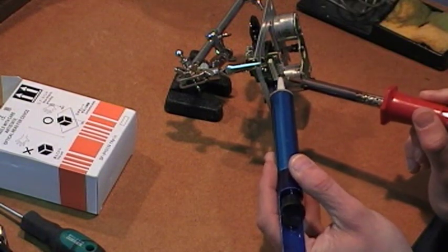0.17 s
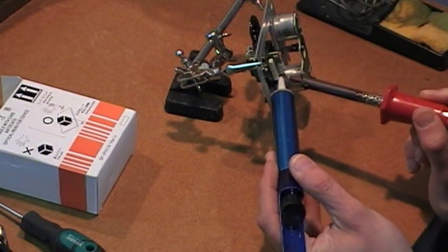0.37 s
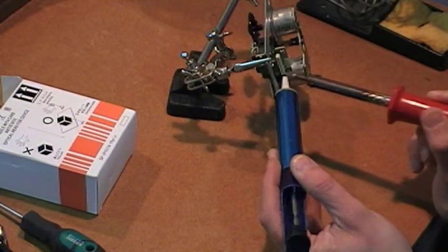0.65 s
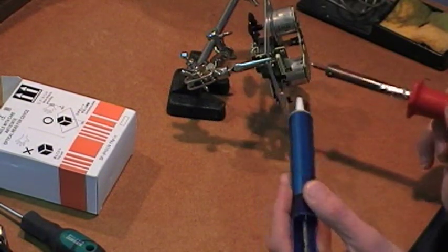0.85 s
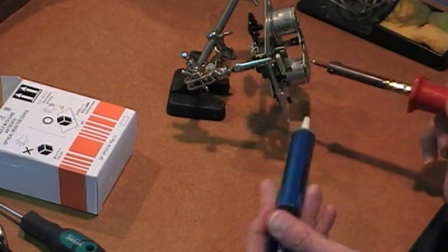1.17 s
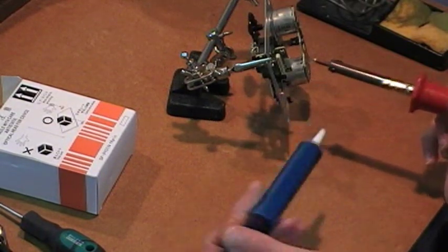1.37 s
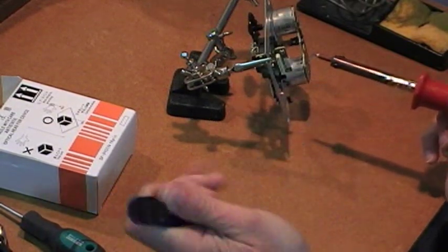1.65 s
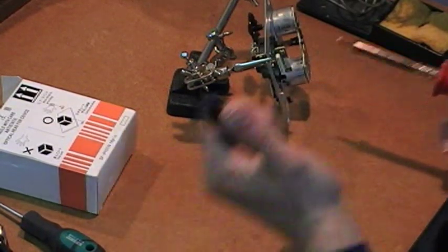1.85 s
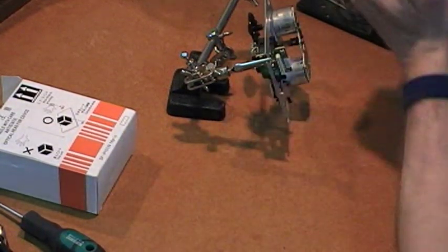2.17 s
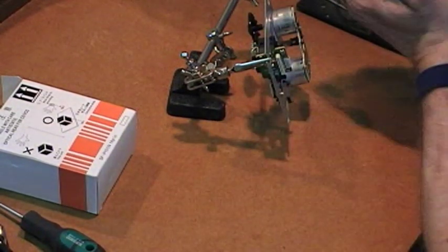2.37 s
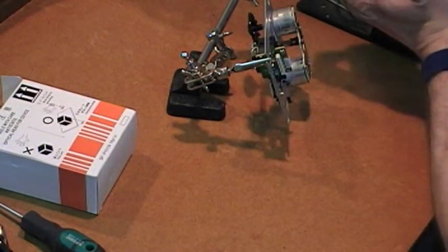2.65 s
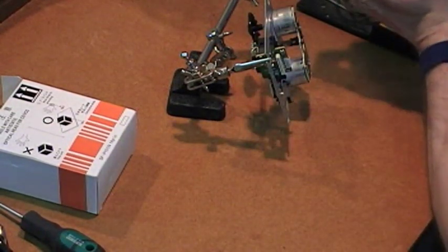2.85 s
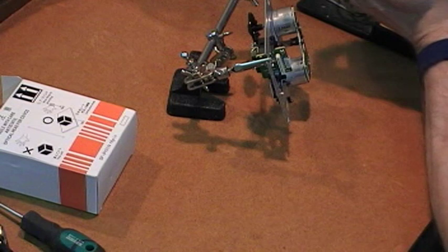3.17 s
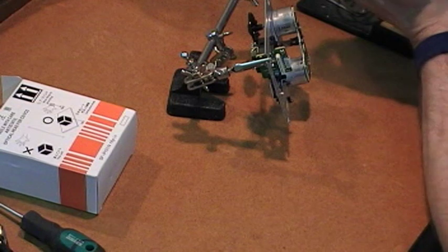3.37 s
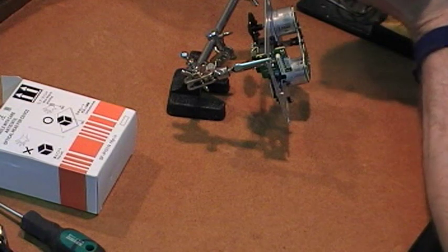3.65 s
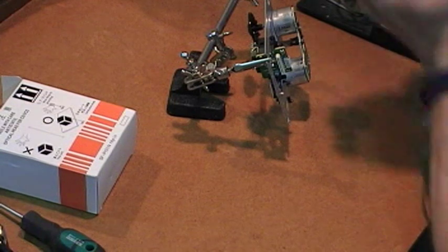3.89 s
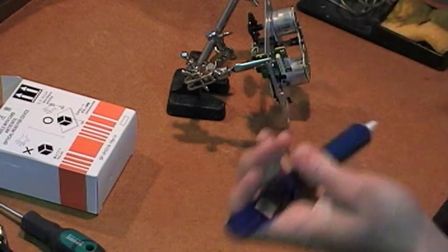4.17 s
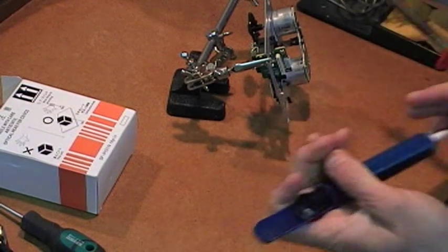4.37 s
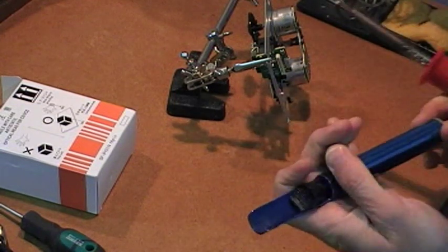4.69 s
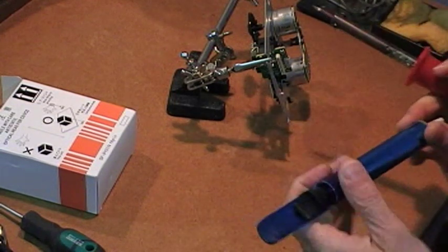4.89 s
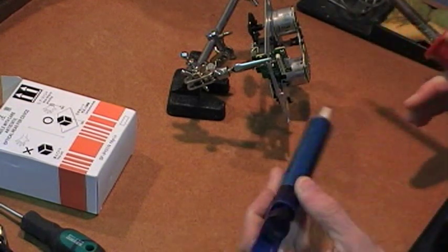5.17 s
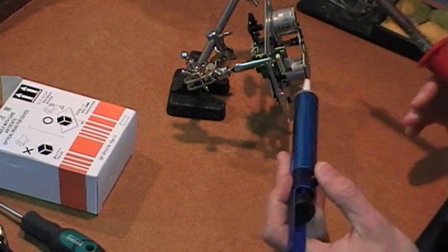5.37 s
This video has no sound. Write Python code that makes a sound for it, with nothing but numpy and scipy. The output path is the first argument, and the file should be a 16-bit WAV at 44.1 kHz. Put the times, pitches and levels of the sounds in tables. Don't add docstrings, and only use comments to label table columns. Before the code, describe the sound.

Over steady camera hiss and a thin motor whine, a latch ticks and a hand pump discharges in one loud crack with a brief airy tail. After a quiet gap with barely audible handling, skin and sleeve scuff the bench. A cluster of sharp metallic and plastic clicks re-cocks the spring, then come small dull taps and faint rustles. Close stereo pickup, slightly right of centre, in a small room.

```python
import sys
import numpy as np
from scipy import signal
from scipy.fft import rfft, irfft
from scipy.io import wavfile
from scipy.ndimage import map_coordinates

SR = 44100
rng = np.random.default_rng(int(sys.argv[2]) if len(sys.argv) > 2 else 0)


def waveform_to_disk(signal):
    frames = np.transpose(np.atleast_2d(signal))
    scaled = np.clip(frames, -1, 1) * 32767
    samples = np.round(scaled).astype(np.int16)
    wavfile.write(sys.argv[1], SR, samples)


def gain_from_db(level_db):
    decades = np.asarray(level_db, float) / 20
    return 10 ** decades


N = 243873

# [t/s, tube ring peak level/dB,
# bench thud level/dB against the ring, barrel knock level/dB against the ring, chatter length/ms]
LATCH_KNOCKS = [
    (0.4047, -38, -40, -27, 3.9),
    (0.4737, -18, -28, -15, 5.4),
    (0.4797, -34.5, -28, -7.5, 3.4),
    (0.483, -51.5, -18.5, -12.5, 15),
]
FIRING_KNOCKS = [(0.5538, -19, -32.5, -17.5, 9.9), (0.5563, -6.5, -30.5, -14.5, 2.0),
                 (0.558, -6.5, -32.5, -19.5, 2.5), (0.5615, -20, -26, -19.5, 3),
                 (0.566, -20, -32.5, -11, 3.3), (0.5733, -20.5, -2.5, 6, 0.54),
                 (0.5757, -25, -7.5, 0.5, 1.1), (0.579, -23.5, -8.5, 3, 1.06),
                 (0.583, -17.5, -17.5, -2.5, 1.4), (0.5848, -13.5, -24.5, -13.5, 0.62),
                 (0.5866, -13, -26, -16, 2.7), (0.591, -27, -23.5, -4, 3), (0.6015, -31, -15, -4.5, 2.9),
                 (0.6045, -36, -18, 7, 1.8), (0.782, -46, -31, 5, 2.3)]
COCKING_KNOCKS = [(2.9223, -48, -12, -11, 0.55), (2.9574, -57, -30, -10, 3.6), (2.9658, -34, -19, -6.5, 2),
                  (2.9951, -42, -29, -10, 0.93), (3.0992, -27, -40, -16, 2.5), (3.1046, -31, -43, -16, 2.5),
                  (3.1793, -56, 0, 5, 3), (3.3338, -52, -18, -9, 2.2), (3.3608, -27, -20, -14, 3.1),
                  (3.3813, -38, -28, -24, 23.4), (3.4444, -47, -22, -7.5, 3.9), (3.4785, -51, -20, -16, 2),
                  (3.655, -51, -7, -11, 2.96), (3.6667, -49, -12, 1, 8.9), (3.6747, -37, -13, -9, 3.1),
                  (3.6836, -28, -13.5, -9, 9.4), (3.6956, -40, -18, -13, 2.9), (3.8296, -54, -16, 11, 2.6)]
FUMBLING_KNOCKS = [(1.4551, -44.5, -30, -25, 1.6), (1.479, -55.5, 1, -23, 3.7),
                   (1.5602, -59.5, 10, -24, 6.2), (1.6324, -50, -16, -32, 7.6),
                   (1.6974, -57.5, -18.5, 5, 2.4), (1.7295, -52, -25, -21, 3), (1.762, -44, -37, -14, 1.5),
                   (1.9385, -65.5, 12, 7, 1.9), (2.0646, -42, -30, -6, 5), (2.39, -50.5, 4, 8, 7.6),
                   (2.613, -48, -11, -5, 4.9), (4.0267, -56.5, 2.5, 1, 2.4), (4.0642, -56, -9, -4, 2.8),
                   (4.1053, -51, 2, -6, 1), (4.2718, -57, 0, 8, 6), (4.4732, -49, -3, -7, 4.7),
                   (4.5184, -42, -11, -9, 1.5), (4.5844, -66.5, 12, -10, 2.5),
                   (4.6907, -60.5, -2, -1.5, 3.6), (5.1012, -52, -20.5, -18, 5.6), (5.1391, -72, 17, -4, 5)]

# [f/Hz, level/dB, time to fall 60 dB/s]
LATCHED_PUMP = [
    [(590, -20, .01), (1100, 2.5, 0.005)],
    [(1390, 8, 0.0031), (1620, -2.5, .01), (2380, -5, 0.005)],
    [(3000, 2, 0.004), (4400, 1, 0.004), (4570, -2, 0.004)],
    [(6060, -14, .003), (6870, -1, 0.003), (7800, 11.5, 0.003), (9400, 1.5, 0.0032), (10310, 6, .0025),
     (11600, -8.5, 0.0012)],
]
FLYING_PISTON = [
    [(216, -18, 0.04), (375, -0.5, 0.03), (648, 5.5, 0.026), (816, 0, 0.02), (1280, -5, 0.015)],
    [(1503, -7.5, 0.017), (1810, -4, 0.013), (2110, -0.5, 0.0064), (2510, 2, 0.0042)],
    [(2820, -2.5, 0.019), (3607, -17, .005), (4530, 8, 0.005), (5050, 12, 0.0047)],
    [(5960, -12.5, 0.0013), (6800, 1.5, 0.0046), (7600, 3.5, 0.0067), (9100, -4, 0.0045),
     (8400, -2, 0.0044), (10200, -9, 0.0025), (12140, -10, 0.0034), (14500, -18, 0.0015)],
]
PUMP_IN_HANDS = [
    [(250, -31, 0.031), (590, -3.5, 0.017), (824, 6, 0.014), (1066, 12, 0.02)],
    [(1790, -3, 0.012), (2080, -2, 0.012), (2570, 7, 0.013)],
    [(2900, -3, 0.0096), (3510, -9, 0.009), (4350, -9, 0.01)],
    [(6900, 6.5, 0.0055), (7460, 17, 0.011), (7770, 2.5, 0.02), (8740, 7, 0.0037), (11000, -18, 0.003),
     (10600, 12, 0.0026), (12200, -12, 0.0019)],
]

# [low f/Hz, high f/Hz]
CRACK_BANDS = [(380, 1500), (1200, 2830), (2700, 4870), (6900, 9820)]

# [t/s, peak level/dB, f/Hz, length/ms]
SPRING_SONGS = [(3.1, -41, 7300, 40), (3.105, -44, 7550, 70), (3.1, -42, 3550, 35), (3.102, -46, 4500, 30),
                (3.363, -44, 7450, 60), (3.676, -42, 7800, 45), (3.675, -46, 6000, 20),
                (3.686, -46, 2450, 50), (3.832, -52, 8500, 60), (0.558, -21, 7700, 20),
                (0.557, -24, 5020, 12), (0.577, -24, 1800, 45)]
# [t/s, peak level/dB, f/Hz, length/ms]
SQUEAKS_AND_BUMPS = [(0.782, -30, 7750, 2.1), (3.0165, -41.5, 9000, 0.93), (3.478, -52, 10000, 2.5),
                     (4.448, -46, 6660, 30), (2.954, -53, 8700, 8), (0.4742, -19, 4400, 3),
                     (0.4738, -32, 1050, 4), (0.556, -12, 4790, 5.8), (0.573, -17, 2200, 2.5),
                     (3.099, -35, 3550, 13.6), (3.099, -30, 7300, 9), (3.3608, -35, 5960, 8),
                     (3.361, -32, 7450, 7.5), (3.684, -40.5, 6000, 8.8), (3.684, -37, 4400, 8),
                     (3.675, -40, 7800, 10), (4.5185, -43.5, 2900, 5.3), (4.52, -54, 580, 30),
                     (2.65, -48, 1700, 90), (2.19, -49, 2900, 83), (2.968, -51, 9000, 60),
                     (2.985, -48, 3300, 50), (3.832, -44.5, 1650, 63), (3.835, -48, 2450, 60),
                     (3.869, -50, 2000, 50), (3.935, -55.5, 3560, 56), (4.026, -56, 2800, 83),
                     (4.061, -56, 2100, 84), (2.17, -48, 1550, 80), (2.345, -47, 600, 55),
                     (2.38, -48, 1500, 70), (4.897, -54, 8280, 21), (4.101, -55.5, 221, 14),
                     (4.579, -55, 290, 47), (4.687, -54.5, 260, 26), (0.575, -26, 640, 12),
                     (0.575, -43, 200, 30), (0.479, -30, 3400, 3), (0.482, -35, 7400, 40),
                     (2.9655, -39, 1500, 5), (2.9655, -41, 3300, 4), (0.4045, -39, 7700, 5),
                     (3.099, -38, 2000, 20), (3.165, -50, 9800, 15), (3.179, -45, 1700, 4),
                     (4.272, -50, 1150, 30), (2.66, -53, 700, 90)]
# [t/s, peak level/dB, centre f/Hz]
GRIT_CLICKS = [(0.125, -58, 10500), (0.2425, -53, 8500), (2.1245, -47, 1620), (2.158, -51, 1090),
               (2.2, -42, 6000), (2.221, -50, 7500), (2.2644, -44, 5000), (2.2886, -37, 5000),
               (2.341, -42, 3000), (2.365, -39, 1460), (2.392, -38, 8000), (2.4225, -45, 1240),
               (2.65, -42, 1860), (2.739, -51, 1358), (3.169, -50, 11000), (3.361, -43, 12500),
               (3.479, -50, 12000), (3.543, -52, 8500), (3.686, -44, 12500), (3.8127, -49, 1260),
               (3.8292, -42, 1670), (3.855, -47, 1660), (3.8874, -42, 1990), (3.8986, -40, 1700),
               (4.0073, -49, 2240), (4.1095, -43, 1500), (4.2727, -42, 2200)]

# [t of most pressure/s, level/dB, swell/ms per 20 dB,
# fade/ms per 20 dB, hardness level/dB]
RUB_STROKES = [(0.482, -48, 4, 80, 9), (0.59, -39, 15, 115, 2), (0.78, -58.5, 108, 214, 4.5),
               (1.566, -63, 56, 70, -14), (1.4, -82, 43, 40, 12), (2.069, -51.5, 2, 307, -2),
               (2.21, -49, 150, 119, 0.5), (2.388, -48.5, 191, 224, -3.5), (2.66, -53.5, 15, 180, -5.5),
               (2.75, -57, 118, 35, -3.5), (2.971, -50, 5, 95, 4), (3.105, -58, 6, 107, 14.5),
               (3.184, -54, 19, 28, 0), (3.389, -51, 38, 59, 8), (3.691, -53, 30, 90, 3),
               (3.834, -56, 5, 159, 0), (3.895, -49.5, 106, 30, -2.3), (3.93, -58.5, 30, 40, -2),
               (4.04, -69.5, 36, 192, 15), (4.11, -62, 59, 134, -10), (4.276, -56, 5, 80, -1),
               (4.539, -71, 25, 176, -17.5), (4.694, -64, 15, 58, -9), (5.147, -67.5, 18, 70, -10.5),
               (5.31, -66, 45, 57, -5), (5.42, -64.5, 80, 450, -1.5)]
# [t of most flow/s, level/dB,
# swell/ms per 20 dB, fade/ms per 20 dB]
RUSTLE_STROKES = [(0.126, -65.5, 18, 7), (0.6, -40, 15, 95), (0.76, -48, 83, 184), (0.83, -53, 115, 99),
                  (1.144, -59, 50, 68), (1.244, -62.5, 46, 88), (1.398, -58, 45, 45), (1.558, -56, 68, 95),
                  (1.771, -62, 47, 108), (2.068, -51, 5, 14), (2.09, -57, 22, 178), (2.21, -55, 84, 65),
                  (2.36, -54.5, 157, 206), (2.614, -61, 26, 25), (2.72, -62, 130, 78), (2.98, -59, 40, 160),
                  (3.085, -60, 15, 40), (3.105, -53, 6, 164), (3.388, -53, 34, 83), (3.52, -61, 120, 62),
                  (3.69, -62, 53.5, 150), (3.884, -55.5, 89, 107), (4.1, -60, 123, 350.5),
                  (4.278, -62, 48, 81), (4.457, -50.5, 12, 21), (4.519, -59, 4, 27.5),
                  (4.789, -58.5, 41, 67.5), (4.903, -55.5, 11, 30.5), (5.11, -64.5, 38, 24),
                  (5.211, -66, 79, 54), (5.29, -61, 12, 87), (5.39, -60.5, 32, 903)]

# [f/Hz, level/dB per Hz]
RUMBLE_COLOUR = [(90, -48), (170, -11), (300, -10.5), (550, 2.5), (700, -1), (1100, -35.5)]
SCUFF_COLOUR = [(450, -27), (750, -0.5), (1500, 0.5), (2200, -2.5), (3300, -38.5)]
SCRAPE_COLOUR = [(1500, -26.5), (2300, 2.5), (3300, -1), (4300, -5.5), (7000, -31.5)]
RUSTLE_COLOUR = [(3500, -8), (5500, -5), (8000, 3), (10500, 0), (13800, -15), (15500, -29)]

# [f/Hz, time to fall 60 dB/s]
ROOM_DECAY = [(100, .4), (300, 0.32), (1000, 0.3), (3000, 0.33), (8000, 0.2), (15000, 0.057)]
# [f/Hz, level/dB]
ROOM_SPREAD = [(100, -13.5), (500, -11), (1500, -7), (4000, -6), (8000, -3), (15000, 9)]

# [f/Hz, level/dB]
MOTOR_TONES = [(344.5, -83), (726.7, -86), (1093, -74), (1459, -81.5), (2186, -92), (3214, -91.5),
               (4926, -97)]
# [f/Hz, level/dB per Hz]
HISS_COLOUR = [(20, -34), (50, -29.5), (80, -21.5), (105, -21.5), (250, -9.5), (500, -9.5), (1100, -9.5),
               (2400, -14), (4800, -17.5), (6500, -24.5), (7700, -22), (8100, -11), (8600, -21.5),
               (11000, -27.5), (16000, -38.5)]
SHAKE_COLOUR = [(18, -76.5), (30, -36), (124, -14.5), (227, -7), (303, -6.5), (473, -4.5), (526, -5),
                (988, -6.5), (7470, -28.5), (8080, -24.5), (8980, -25.5), (11100, -34.5), (16000, -41.5)]


def contacts(events, body, scatter_db, rel_db, crack_db, clack_db, follows, top_hz):
    detune = 0.025
    out, t = np.zeros(N), np.arange(3072) / SR
    cracks = [signal.butter(2, band, "band", fs=SR, output="sos") for band in CRACK_BANDS]
    floors = [signal.butter(2, 0.68 * tones[0][0], "high", fs=SR) for tones in body]
    for s, peak_db, thud_db, knock_db, ms in events:
        fade = gain_from_db(-20 * t / (ms / 1000))
        onset = np.minimum(t / 0.00045 + 0.23, 1)
        chatter = rng.standard_normal((4, 9, 3072)) * fade * onset
        luck_db = rng.standard_normal((4, 9)) * scatter_db
        shift = 1 + detune * rng.standard_normal((4, 9))
        start = round(s * SR)
        part_db = (thud_db + rel_db, knock_db + rel_db, clack_db + follows * knock_db, 0)
        for j, db in enumerate(part_db):
            tones = np.zeros(3072)
            for k, (hz, tone_db, t60) in enumerate(body[j]):
                tones += gain_from_db(tone_db + luck_db[j, k]) * ring(chatter[j, k], hz * shift[j, k], t60)
            tones = signal.lfilter(*floors[j], tones)
            crack = signal.sosfilt(cracks[j], chatter[j, -1])
            part = tones / np.abs(tones).max() + gain_from_db(crack_db) * crack / np.abs(crack).max()
            out[start:start + 3072] += gain_from_db(peak_db + db - 3.5) * part
    return signal.sosfilt(signal.butter(6, top_hz, fs=SR, output="sos"), out)


def ring(x, hz, t60):
    r, w = gain_from_db(-60 / (t60 * SR)), 2 * np.pi * hz / SR
    return signal.lfilter([0, np.sin(w)], [1, -2 * r * np.cos(w), r * r], x)


def squeaks(events, t60, cycles):
    out = np.zeros(N)
    for s, peak_db, hz, ms in events:
        t = np.arange(3072) / SR / (ms / 1000)
        slips = rng.standard_normal(3072) * t * np.exp(-4.5 * t)
        part = ring(slips, hz, t60 + cycles / hz)
        part = signal.lfilter(*signal.butter(2, hz / 2, "high", fs=SR), part)
        start = round(s * SR)
        out[start:start + 3072] += gain_from_db(peak_db) * part / np.abs(part).max()
    return out


def grit():
    level_db, fade_ms, octaves = -3.5, 1.4, 1.6
    out, t = np.zeros(N), np.arange(512) / SR
    for s, peak_db, hz in GRIT_CLICKS:
        click = rng.standard_normal(512) * gain_from_db(-20 * t / (fade_ms / 1000))
        band = np.clip(hz * 2. ** np.array([-octaves, octaves]), 300, 14000)
        part = signal.lfilter(*signal.butter(1, band, "band", fs=SR), click)
        start = round(s * SR)
        out[start:start + 512] += gain_from_db(peak_db + level_db) * part / np.abs(part).max()
    return out


def rubbing(grain_db, per_s):
    s, db, swell_ms, fade_ms, hard_db = np.transpose(RUB_STROKES)
    parts = (
        (RUMBLE_COLOUR, -6.5 - hard_db),
        (SCUFF_COLOUR, 0),
        (SCRAPE_COLOUR, -2.5 + 0.62 * hard_db),
    )
    out = np.zeros(N)
    for colour, share_db in parts:
        pressure = strokes(s, db + share_db, swell_ms, fade_ms, rest_db=-73.5)
        out += friction(pressure, colour, grain_db, per_s)
    return out


def rustling():
    flow = strokes(*np.transpose(RUSTLE_STROKES), rest_db=-72.0)
    return friction(flow, RUSTLE_COLOUR, grain_db=2.5, per_s=7400)


def strokes(s, db, swell_ms, fade_ms, rest_db):
    swell_bend, fade_bend = 1.7, 1.3
    restless_from_s = 0.9
    t = np.arange(0, N, 32) / SR
    late_ms = 1000 * (t - s[:, None])
    swell = np.abs(late_ms / swell_ms[:, None]) ** swell_bend
    fade = np.abs(late_ms / fade_ms[:, None]) ** fade_bend
    level_db = db[:, None] - 20 * np.where(late_ms < 0, swell, fade)
    power = np.sum(gain_from_db(level_db) ** 2, axis=0)
    power = power + gain_from_db(rest_db) ** 2 * (t > restless_from_s)
    return np.interp(np.arange(N) / SR, t, np.sqrt(power))


def friction(level, colour, grain_db, per_s):
    size_db = grain_db * np.minimum(rng.exponential(1, N), 4)
    slips = gain_from_db(size_db) * rng.choice([-1, 1], N)
    slips = slips * (rng.random(N) < per_s / SR)
    unevenness = gain_from_db(1.2 * drift(40) + 2.0 * drift(70))
    return level * unevenness * rms_one(filtered(slips, colour))


def room(x):
    level_db = -9.5
    scatter_s, scatter_per_s = 0.00007, 160
    size = SR // 2
    t, edges = np.arange(size) / SR, 70 * 2 ** np.arange(0, 8.1, .5)
    white = rng.standard_normal((2, 2, size))
    tail = np.zeros((2, size))
    for k, (low, high) in enumerate(zip(edges, edges[1:])):
        band = signal.sosfilt(signal.butter(2, [low, high], "band", fs=SR, output="sos"), white[k % 2])
        tail += band * gain_from_db(-60 * t / at_hz(ROOM_DECAY, np.sqrt(low * high)))
    tail = tail * np.clip((t - .003) / 0.0014, 0, 1)
    tail = tail / np.sqrt(np.sum(tail ** 2, axis=1, keepdims=True))
    echoes = signal.fftconvolve(x[None], tail, axes=1)[:, :N]
    at = np.arange(N)
    path = np.interp(at / SR * scatter_per_s, np.arange(1000), rng.standard_normal(1000))
    wander = scatter_s * SR * path
    mid, side = (map_coordinates(echo, [at - wander], order=3) for echo in echoes)
    return gain_from_db(level_db) * (mid + filtered(side, ROOM_SPREAD) * np.array([[1], [-1]]))


def camera():
    t = np.arange(N) / SR
    whine = np.zeros(N)
    for hz, db in MOTOR_TONES:
        level = np.sqrt(2) * gain_from_db(db + 0.64 * drift(2.6))
        whine += level * np.sin(2 * np.pi * hz * t + 0.56 * drift(6.3))
    hiss = gain_from_db(-66.5) * rms_one(filtered(rng.standard_normal(N), HISS_COLOUR))
    hum = gain_from_db(-88) * np.sin(2 * np.pi * 101 * t)
    picture_whistle = gain_from_db(-89 + 4.0 * drift(27)) * np.sin(2 * np.pi * 15622 * t)
    head_whistle = gain_from_db(-83.5 + 2.3 * drift(8.3)) * np.sin(2 * np.pi * 10686 * t + .8 * drift(30))
    shake = gain_from_db(-60) * rms_one(filtered(rng.standard_normal(N), SHAKE_COLOUR))
    mid = hiss + whine + hum + picture_whistle
    side = shake + gain_from_db(-12.0) * np.roll(whine, 9) + head_whistle
    return mid + side * np.array([[1], [-1]])


def rms_one(x):
    return x / np.sqrt(np.mean(x ** 2) + 1e-20)


def at_hz(points, hz):
    table = np.array(points)
    return np.interp(np.log(hz), np.log(table[:, 0]), table[:, 1])


def filtered(x, spectrum):
    hz = np.maximum(np.fft.rfftfreq(len(x), 1 / SR), 1)
    return irfft(rfft(x) * gain_from_db(at_hz(spectrum, hz)), len(x))


def drift(rate):
    steps = rng.standard_normal(400)
    return np.interp(np.arange(N) / SR * rate, np.arange(400), steps)


def scene():
    latching = contacts(LATCH_KNOCKS, LATCHED_PUMP, scatter_db=5.0, rel_db=2.0, crack_db=3.0,
                        clack_db=10.0, follows=0.94, top_hz=13100)
    firing = contacts(FIRING_KNOCKS, FLYING_PISTON, scatter_db=-1.5, rel_db=5.5, crack_db=-4.0,
                      clack_db=-9.0, follows=.05, top_hz=16500)
    cocking = contacts(COCKING_KNOCKS, PUMP_IN_HANDS, scatter_db=2.5, rel_db=5.0, crack_db=-2.5,
                       clack_db=2.0, follows=0.59, top_hz=10200)
    fumbling = contacts(FUMBLING_KNOCKS, PUMP_IN_HANDS, scatter_db=3.0, rel_db=4.0, crack_db=-8.5,
                        clack_db=1.0, follows=0.8, top_hz=12500)
    bench = latching + firing + cocking + fumbling
    bench = bench + squeaks(SPRING_SONGS, t60=0.012, cycles=8.1)
    bench = bench + squeaks(SQUEAKS_AND_BUMPS, t60=0.003, cycles=8.1) + grit()
    bench = bench + gain_from_db(-4.0) * (rubbing(grain_db=2.5, per_s=3500) + rustling())
    bench = signal.sosfilt(signal.butter(4, 125, "high", fs=SR, output="sos"), bench)
    direct = bench * gain_from_db(np.array([[-.3], [.3]]))
    lead = 0.28 * np.gradient(bench) * np.array([[-1], [1]])
    return direct + lead + room(bench) + camera()


def roll_off(x):
    return signal.sosfilt(signal.butter(12, 16810, fs=SR, output="sos"), x)


def record(dry):
    mix = signal.sosfilt(signal.ellip(12, .3, 55, 15800, fs=SR, output="sos"), dry)
    return roll_off(mix)


dry = scene()
out = record(dry)
waveform_to_disk(out)
```